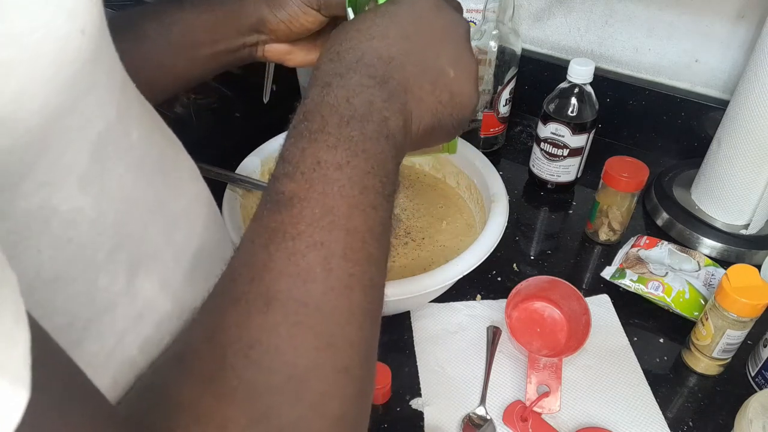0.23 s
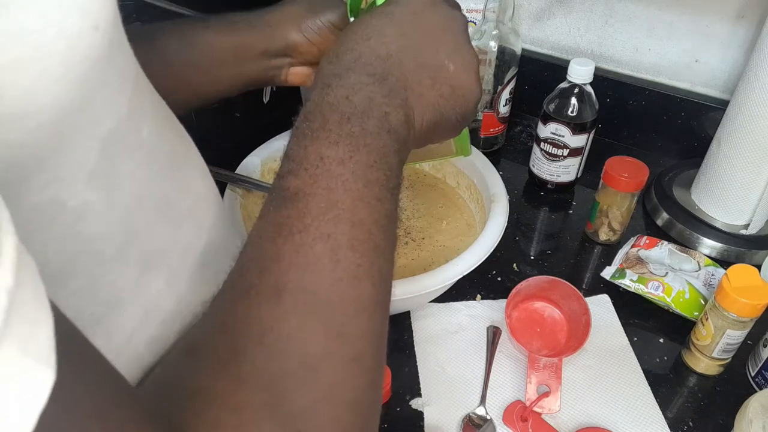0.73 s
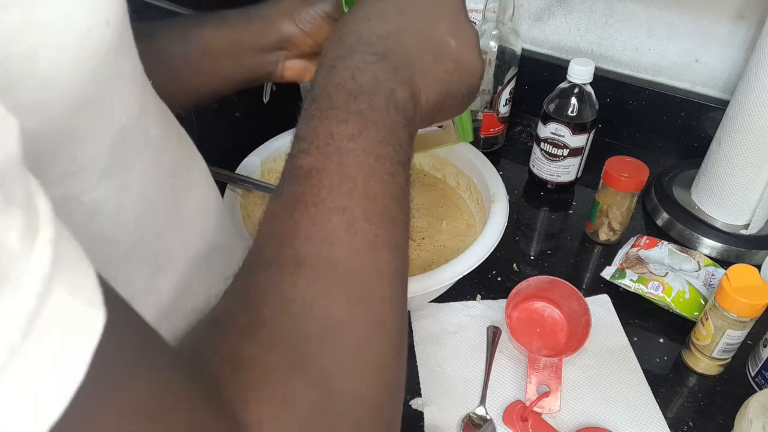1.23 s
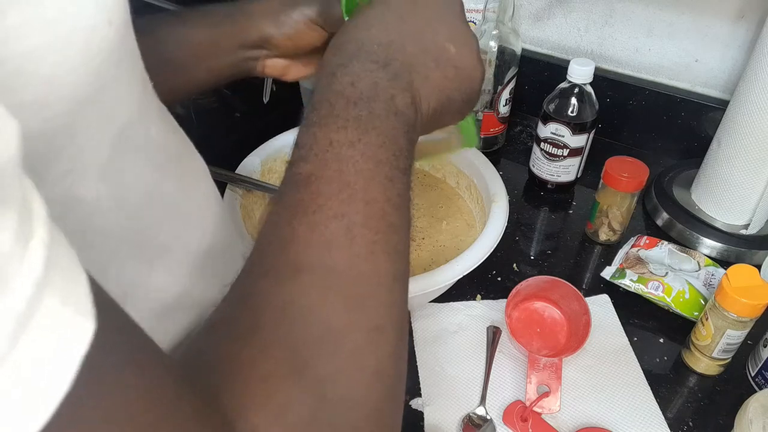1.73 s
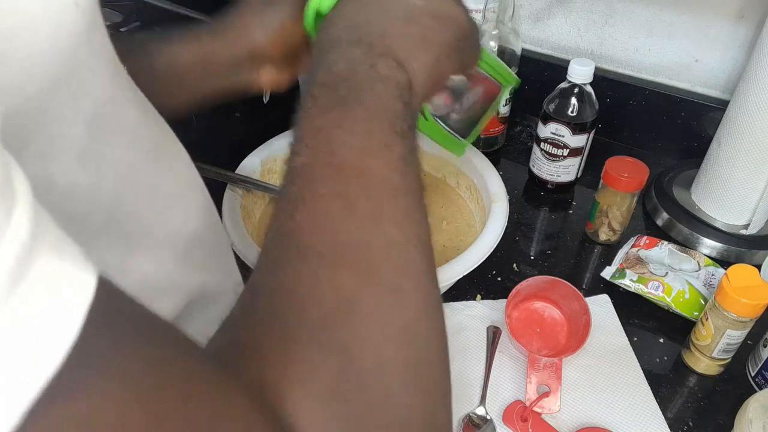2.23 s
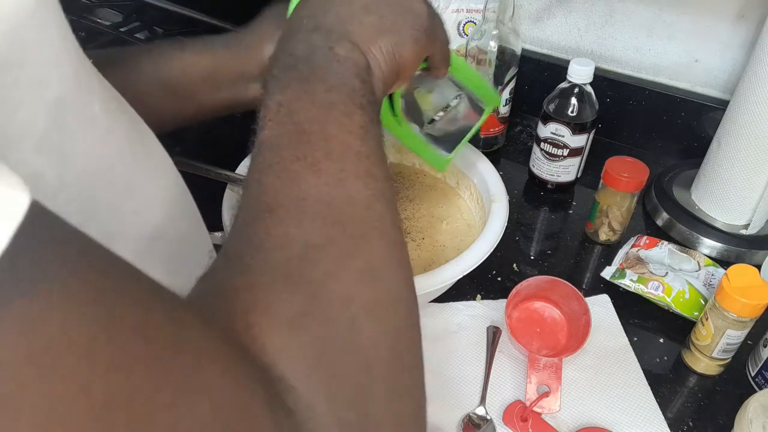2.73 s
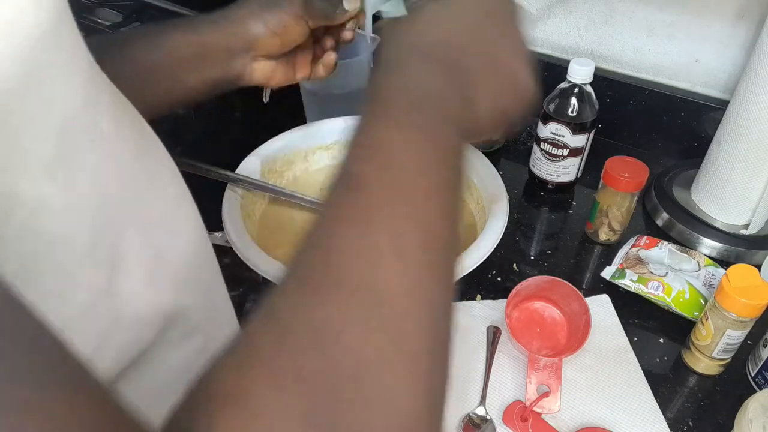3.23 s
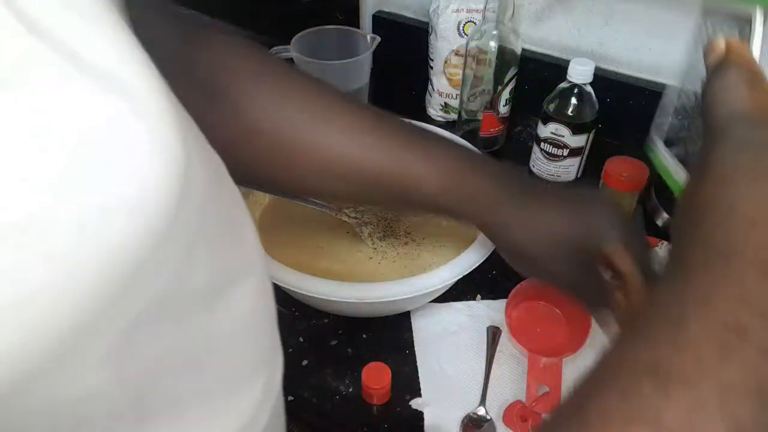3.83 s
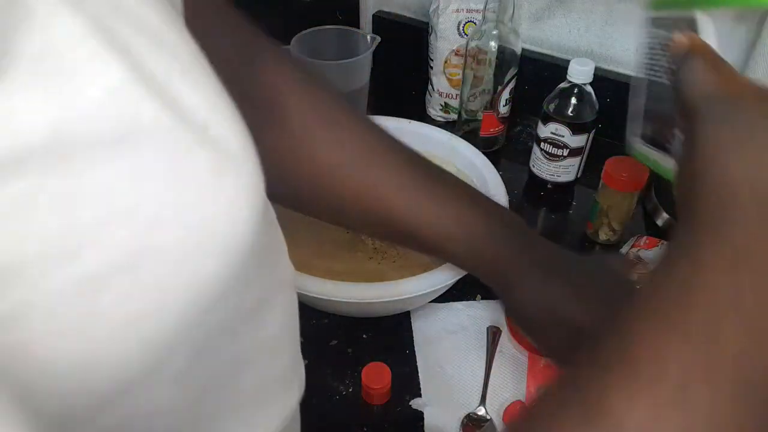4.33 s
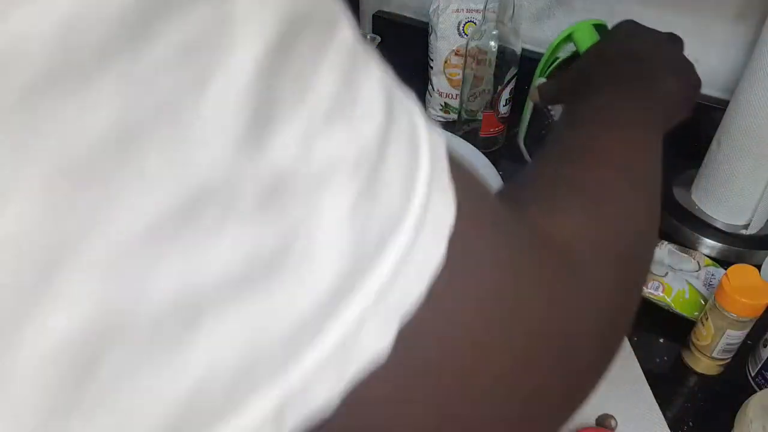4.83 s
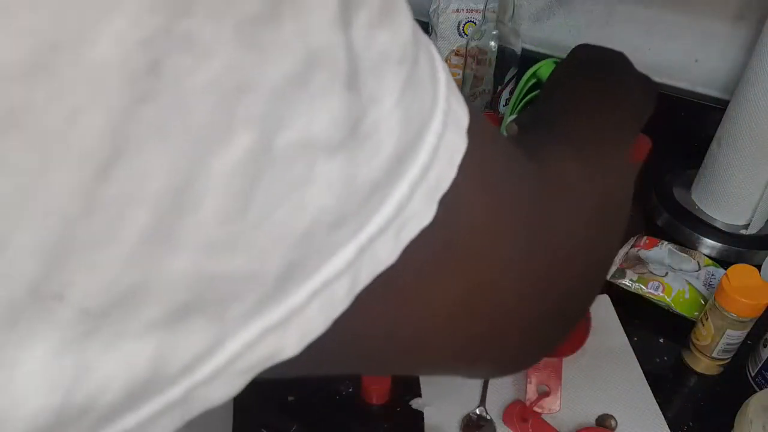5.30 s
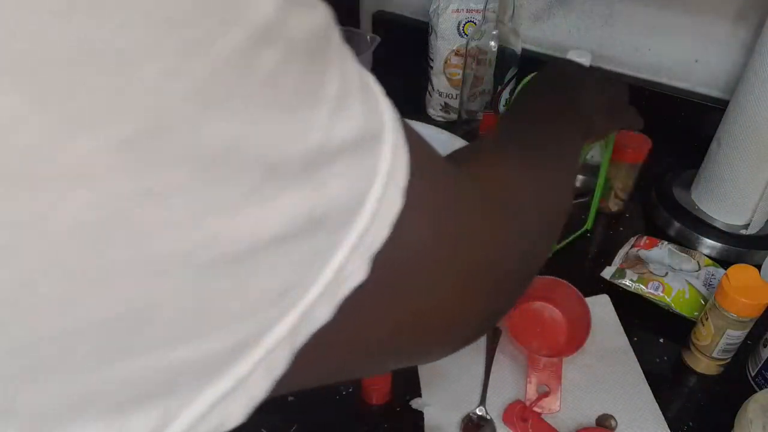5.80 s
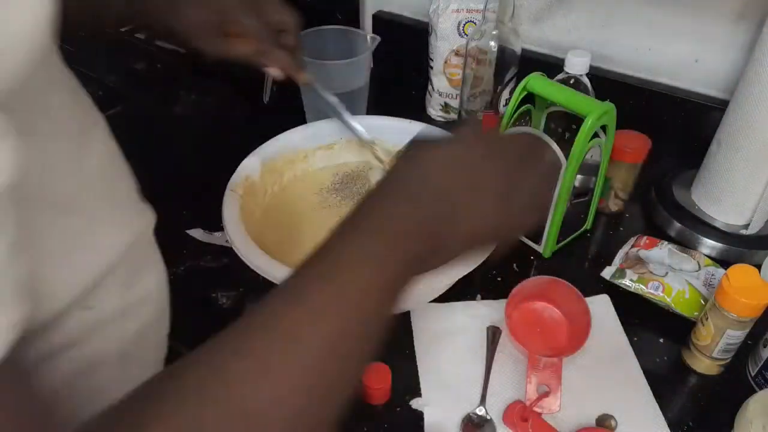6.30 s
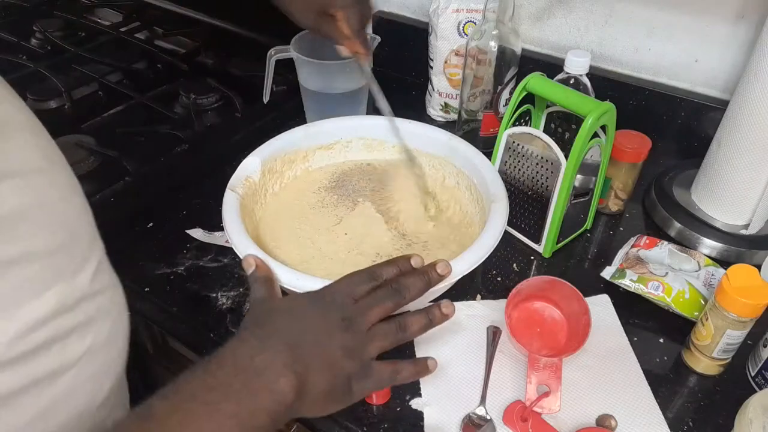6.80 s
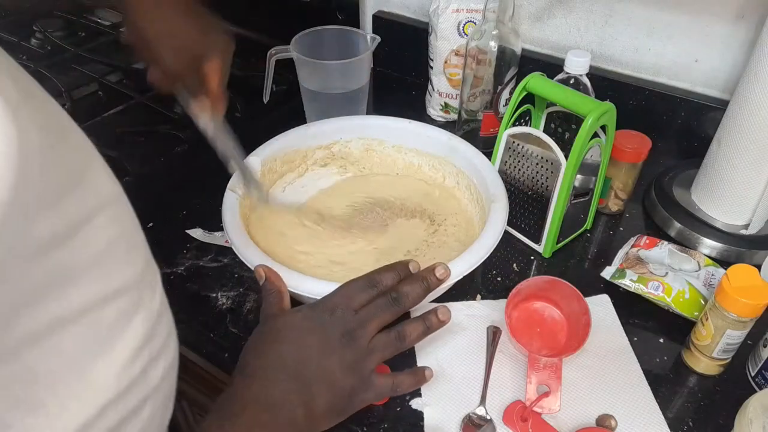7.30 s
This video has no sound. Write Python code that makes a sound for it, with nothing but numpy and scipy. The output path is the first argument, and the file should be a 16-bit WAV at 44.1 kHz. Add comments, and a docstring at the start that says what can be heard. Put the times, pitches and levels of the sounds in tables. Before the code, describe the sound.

In a humming kitchen, nutmeg rasps fast over steel teeth, the grater is tapped clean and knocked onto the counter, then batter is stirred.

```python
"""Kitchen: a nutmeg is rasped on a small steel grater in a plastic frame, over a bowl of batter.
The grater is tapped clean four times, then stood on the counter, where it rocks and clatters.
A spoon stirs the batter and knocks the bowl; an appliance hums throughout.
Rasp and batter are dense random impulses, filtered; blows are noise rattles plus decaying modes;
skids and swishes are gliding resonances. Echoes place each source in the room."""
import sys
import numpy as np
from scipy import signal
from scipy.fft import rfft, irfft
from scipy.io import wavfile
from scipy.ndimage import uniform_filter1d

SR = 44100
rng = np.random.default_rng(int(sys.argv[2]) if len(sys.argv) > 2 else 0)


def log_audio(samples):
    """Write samples as a 16-bit WAV file to the path given in sys.argv[1]."""
    # one column per channel
    frames = np.atleast_2d(samples).T
    # limit to full scale, then quantise
    limited = np.clip(frames, -1, 1)
    pcm = np.round(limited * 32767).astype(np.int16)
    wavfile.write(sys.argv[1], SR, pcm)


N = 332955

# All table levels are relative: source and room gains follow.
# nutmeg strokes: (start [s], time to hardest push [s], length [s], level [dB], tooth fizz [dB],
# singing mode [Hz], its level [dB])
STROKE_ROWS = [(0.0, 0.0027, 0.048, -49, -11, 2580, -82), (0.413, 0.014, 0.14, -49, -11.5, 2580, -60),
               (0.651, 0.031, .075, -44, -6, 2550, -49), (0.762, 0.065, 0.064, -36, -5.5, 2610, -41),
               (0.899, 0.041, 0.073, -35, -8.5, 930, -37.5), (1.012, 0.033, 0.043, -36, -5.5, 920, -34.5),
               (1.129, 0.046, 0.058, -40, -3, 2670, -47), (1.237, 0.026, 0.07, -32.5, -4.5, 2700, -35),
               (1.356, 0.059, 0.058, -35, -4, 1780, -37), (1.461, 0.035, 0.047, -28, -6.5, 2730, -46),
               (1.558, 0.06, 0.059, -40, -8.5, 2680, -64), (1.678, 0.018, .06, -52, -3.5, 2660, -59)]
# light slides between strokes: (start [s], length [s], level [dB])
SLIDE_ROWS = [(0.334, .3, -66), (0.676, 0.79, -54.5), (1.208, 0.34, -55.5), (1.596, 0.14, -74)]
# grating plate modes: (frequency [Hz], width before damping [Hz], level [dB])
PLATE_MODES = [(337, 3.1, -1), (970, 74, -4), (1314, 36, 0), (1414, 43, -10.5), (1810, 110, -1),
               (2578, 39, -3), (3430, 68, -30), (3770, 120, -20), (4150, 46, -9), (5240, 51, -34.5),
               (6940, 53, -9.5), (8850, 77, -34.5), (11320, 380, -21.5), (13400, 190, -15)]
# rasp spectrum: (frequency [Hz], level [dB per Hz])
RASP_SPECTRUM = [(140, -56), (230, -31.5), (322, -8), (468, -22), (600, -8), (855, -6.5), (918, 3.5),
                 (1100, -6), (2390, -2), (2570, -4), (3360, -13.5), (4230, -12.5), (7870, -22.5),
                 (13900, -20.5), (16000, -25)]
# scrape on the plate before a tap: (time [s], length [s], level [dB], first [Hz], last [Hz], width [Hz])
SCRAPE_ROWS = [(2.689, 0.067, -54, 2500, 3000, 706)]
# nutmeg catches on a tooth: (time [s], level [dB], bass [dB], treble [dB])
CATCH_ROWS = [(0.428, -27, 10.5, -7), (0.494, -27.5, 12.5, -3.5), (0.659, -30, 7, -6.2),
              (0.689, -16, -4, -5), (0.909, -21.5, 2.2, 1.5), (1.051, -20, -2.5, 2),
              (1.245, -27.5, -5.5, 3.5), (1.275, -18, -8, 11.5), (1.393, -16, 4.5, -7),
              (1.496, -12, -2.5, 2.5), (1.612, -30.5, -10, 5)]
# grater tapped clean: (time [s], peak [dB], bass [dB], treble [dB], rattle t60 [s])
TAP_ROWS = [(2.292, -28, -0.5, -3, 0.14), (2.531, -24, -8.5, -16.5, 0.056),
            (2.755, -17.5, -18, -17.5, 0.039), (2.998, -21.5, -15, -21, 0.1)]
# tap contact spectrum: (frequency [Hz], level [dB per Hz])
TAP_SPECTRUM = [(88, -32), (150, -16.5), (315, -13), (790, -9.5), (923, -2.5), (1360, -2.5), (1790, -4),
                (2020, -2), (2180, -9.5), (3350, -21), (5360, -30.5), (5790, -27), (7620, -38.5),
                (11700, -40), (16000, -41)]
# hand-held grater modes: (frequency [Hz], level [dB], t60 [s])
HELD_MODES = [(670, -15, 0.08), (890, 0.5, 0.073), (1008, -3, 0.059), (1200, -12, 0.39), (1590, -7, 0.097),
              (1787, 12, 0.05), (1940, -26, 0.079), (2145, 0, 0.088), (2590, -9, 0.12), (3634, -25, .2),
              (4800, -21, 0.12)]
# grater lands, rocks, is moved: (time [s], peak [dB], bass [dB], treble [dB], rattle t60 [s])
KNOCK_ROWS = [(4.755, -16, -4, -15, 0.26), (4.834, -9.5, -5.5, -16, 0.16),
              (4.863, -13.5, -14.5, -50, 0.086), (4.891, -21, -17, -24, 0.062),
              (4.926, -19.5, -15, -47.5, 0.07), (4.966, -23, -14, -47, 0.09),
              (5.115, -30, -7.5, -16, 0.037), (5.132, -30, -4, -15, 0.25), (5.375, -25.5, 6, -23.5, 0.21),
              (5.418, -13.5, -17.5, -30.5, 0.17), (5.625, -6.5, -14, -22, 0.17),
              (5.631, -11.5, -13, -38.5, 0.11), (5.746, -9.5, -8.5, -19.5, 0.082),
              (5.774, -15, -22, -25.5, 0.1)]
# counter contact spectrum: (frequency [Hz], level [dB per Hz])
KNOCK_SPECTRUM = [(35, -33), (60, -3), (124, -10), (184, -10), (338, 3.5), (427, -4.5), (593, -2.5),
                  (1470, -10), (1620, -19.5), (1860, -16), (2140, -20), (4320, -42.5), (7940, -52.5),
                  (13600, -55.5), (16000, -61)]
# frame on the counter, modes: (frequency [Hz], level [dB], t60 [s])
FRAME_MODES = [(112, -22.5, .25), (282, 4.5, 0.058), (355.1, -6, 0.37), (435, -4.5, 0.076), (507, 1, 0.15),
               (589, -17.5, 0.37), (653, -22.5, 0.16), (715, -15, 0.13), (860.2, -4.5, 0.43),
               (960, -7, 0.32), (1240, 1.5, 0.094), (1634, -3.5, 0.22), (1703, 0.5, 0.067),
               (1750, -29.5, 0.15)]
# feet judder on the counter: (time [s], length [s], level [dB], first [Hz], last [Hz], width [Hz])
SKID_ROWS = [(4.83, 0.041, -29.5, 335, 365, 130), (4.865, 0.05, -21.5, 550, 635, 150),
             (4.92, 0.022, -28, 328, 356, 120), (4.925, 0.1, -32.5, 537, 697, 154),
             (4.966, 0.027, -39, 326, 400, 130), (5.128, 0.04, -31.5, 605, 565, 110),
             (5.765, 0.074, -29.5, 780, 780, 161)]
# high plate ring after landing, heard on through the rocking: (time [s], peak [dB])
ZING_ROWS = [(4.863, -31), (5.116, -48.5)]
# free plate modes: (frequency [Hz], level [dB], t60 [s])
ZING_MODES = [(2095, 2, 0.61), (2580, -6.5, 0.52), (4630, -5, 0.12), (5750, -1.5, 0.2), (8500, -10.5, 0.29),
              (10600, -15, 0.19)]
# low thumps, and the low body of the knocks:
# (time [s], level before rise [dB], frequency [Hz], t60 [s])
THUMP_ROWS = [(1.277, -35, 330, 0.15), (1.501, -22, 330, 0.12), (1.501, -32, 568, 0.077),
              (4.754, -21, 318, 0.12), (4.759, -28, 121, 0.13), (4.831, -13, 310, 0.088),
              (5.116, -24.5, 318, 0.1), (5.419, -28.5, 114, 0.087), (5.626, -32.5, 359, 0.22),
              (5.63, -25, 114.5, 0.11), (5.745, -26, 248, .1), (5.749, -24.5, 123.6, 0.11),
              (6.485, -19.5, 118, 0.094), (6.495, -22, 78.4, 0.11), (6.541, -28, 73, 0.078),
              (7.367, -12.5, 102.5, 0.043)]
# spoon sweeps through batter: (start [s], length [s], level [dB], wet fizz [dB])
STIR_ROWS = [(6.393, 0.16, -78.5, 10.5), (6.552, 0.11, -54.5, -6.5), (6.676, 0.44, -69.5, 4.5),
             (6.863, 0.27, -50, -10.5), (7.121, 0.14, -51.5, 1), (7.276, 0.03, -44.5, -15),
             (7.4, 0.13, -65, 6.5)]
# batter pop spectrum: (frequency [Hz], level [dB per Hz])
BATTER_SPECTRUM = [(180, -17), (300, -10), (478, -9.5), (645, 0), (749, -1.5), (1140, -5), (1810, -6),
                   (2070, -9), (4370, -23.5), (8090, -30.5), (12700, -34.5), (16000, -32)]
# spoon swishes: (time [s], length [s], level [dB], first [Hz], last [Hz], width [Hz])
SWISH_ROWS = [(6.405, 0.045, -47, 247, 260, 163), (6.405, 0.067, -61.5, 2280, 2350, 251),
              (6.405, 0.059, -67, 4900, 5060, 594), (6.87, 0.047, -49, 2090, 2500, 700),
              (6.92, 0.038, -57, 4300, 4450, 900), (6.94, 0.029, -47.5, 750, 865, 255),
              (7.04, 0.069, -49, 1080, 1540, 400), (7.14, 0.06, -53, 2600, 4050, 2200),
              (7.29, 0.013, -45, 1100, 980, 250)]
# spoon hits bowl: (time [s], peak [dB], bass [dB], treble [dB], rattle t60 [s])
SPOON_ROWS = [(6.486, -21.5, -2, -9.5, 0.023), (7.355, -11.5, -21.5, -33.5, 0.019)]
# spoon contact spectrum: (frequency [Hz], level [dB per Hz])
SPOON_SPECTRUM = [(120, -38), (200, -20.5), (271, -33), (360, -24), (532, -17), (624, 1), (800, -11),
                  (1030, -2.5), (1270, -10), (1340, -12), (1540, -18), (2200, -26), (3560, -56),
                  (14000, -70)]
# mixing bowl modes: (frequency [Hz], level [dB], t60 [s])
BOWL_MODES = [(349.4, -8, 0.23), (418, -7, 0.14), (638, -1.5, 0.17), (915, -16, 0.24), (995, 8, 0.095),
              (1081, -3.5, 0.19), (1160, -18, 0.4), (1242, 3.5, 0.14)]
# ticks of things handled: (time [s], peak [dB], bass [dB], treble [dB], rattle t60 [s])
TICK_ROWS = [(1.892, -37, -18, 4, 0.014), (1.992, -51, -17, 3, 0.025), (4.039, -52.5, 14, -10, 0.088),
             (4.16, -47.5, 0, -15.5, 0.029), (4.295, -45, -24, -10, 0.053), (4.313, -43.5, -23, -24, 0.091),
             (7.256, -32, -9.5, -15, 0.0072), (7.466, -44, -17, -13, 0.037)]
# tick spectrum: (frequency [Hz], level [dB per Hz])
TICK_SPECTRUM = [(240, -76), (400, -7.5), (964, 0), (1630, -2.5), (4200, -26.5), (5600, -19), (7870, -29),
                 (13500, -25), (16000, -67)]
# crisp dry snaps: (time [s], peak [dB])
SNAP_ROWS = [(3.865, -40), (4.046, -48), (4.064, -46), (4.074, -47), (7.256, -26.5)]
# snap spectrum: (frequency [Hz], level [dB per Hz])
SNAP_SPECTRUM = [(2000, -38), (6000, -9), (11000, 1), (16000, -5)]
# sleeve slides as the arm reaches across: (start [s], length [s], level [dB])
RUSTLE_ROWS = [(5.16, 0.29, -68), (5.446, .14, -63), (5.583, 0.027, -47.5), (6.37, .09, -72)]
# cloth spectrum: (frequency [Hz], level [dB per Hz])
CLOTH_SPECTRUM = [(500, -1.5), (2000, -6.5), (5500, -10.5), (9000, -13.5), (16000, -9.5)]
# appliance hum: (frequency [Hz], rms level [dB])
HUM_TONES = [(48.4, -53), (102.3, -74), (360.7, -74), (398.4, -77.5), (446.8, -75.5)]
# fan noise and hiss spectrum: (frequency [Hz], level [dB per Hz])
AIR_SPECTRUM = [(41, -39.5), (70, -6), (108, -1), (174, -21.5), (328, -12.5), (351, -17), (451, -16.5),
                (606, -24.5), (711, -23.5), (1370, -36.5), (1890, -34.5), (4000, -44), (5620, -39.5),
                (7560, -45), (16000, -35)]
# room decay: (frequency [Hz], t60 [s])
ROOM_T60 = [(100, 0.65), (350, 0.58), (1000, 0.47), (4000, 0.48), (8000, 0.45), (15000, 0.44)]
# left-right likeness of echoes and air: (frequency [Hz], correlation [0-1])
LIKENESS = [(100, 0.55), (300, 0.69), (600, 0.21), (1200, 0.03), (4000, 0.016), (15000, .02)]

BASS_HZ, TREBLE_HZ, EDGE_HZ = 700, 3500, 16150
PLATE_CUT_HZ = 222  # low cut that keeps the plate ring thin
BITE_S, BITE_DB, EASE_DB, RELEASE_DB_PER_S = 0.0049, -6.5, -9.5, -500
BASS_START_DB, BASS_DB_PER_S, BASS_TOP_DB = -7.5, 191, 1.5  # frame shudder grows during a stroke
SING_S, SING_WIDTH_HZ = 0.042, 130
CATCH_T60_S = 0.023


def grating(chips_per_s=2600, rows_per_s=170, rows_db=3, ring_db=-4.0, bass_db=-2.4, fizz_db=4.0):
    """Teeth snap off tiny chips, in clumps as the rows pass; each chip rings the plate."""
    clumps = np.interp(np.arange(N) * rows_per_s / SR, np.arange(N), rng.standard_normal(N))
    chips = impulses(chips_per_s, cap=3) * amp(rows_db * np.clip(clumps, -1.5, 1.5))
    rung = np.zeros(N)
    for here in shares(per_s=17, count=7):
        plate_ring = ring(loaded(plate(damping=1.3), detune=.035, spread_db=4))
        rung += signal.oaconvolve(chips * here, evened(plate_ring))[:N]
    thin_ring = split(rung, PLATE_CUT_HZ)[1]
    rasp = evened(colour(chips, RASP_SPECTRUM)) + amp(ring_db) * evened(thin_ring)
    low, middle, high = map(evened, bands(rasp))
    bass, push, fizz = stroking()
    return amp(bass_db) * bass * low + push * middle + amp(fizz_db) * fizz * high


def stroking(slide_bass_db=3.0, slide_fizz_db=-6):
    """Bass, middle and fizz gains: strokes bite, peak, ease and let go, over light sliding."""
    slide = sum(swell(s, length, attack_s=0.019, release_s=.025) * amp(db) for s, length, db in SLIDE_ROWS)
    power = (amp([[slide_bass_db], [0], [slide_fizz_db]]) * slide) ** 2
    t = np.arange(SR // 4) / SR
    bass = np.minimum(BASS_START_DB + BASS_DB_PER_S * t, BASS_TOP_DB)
    for s, peak_s, length, db, fizz, _, _ in STROKE_ROWS:
        push_db = np.interp(t, [0, peak_s, max(length, peak_s)], [BITE_DB, 0, EASE_DB])
        push_db += RELEASE_DB_PER_S * np.maximum(t - length, 0)
        push = np.minimum(t / BITE_S, 1) * amp(db + push_db)
        for band, share in zip(power, (bass, 0, fizz)):
            add(band, s, (push * amp(share)) ** 2)
    return np.sqrt(power)


def singing():
    """As the teeth bite, slips excite one plate mode per stroke; a scrape glides upward."""
    rows = [(s, SING_S, db, hz, hz, SING_WIDTH_HZ) for s, _, _, _, _, hz, db in STROKE_ROWS]
    return chatter([*rows, *SCRAPE_ROWS], slips_per_s=880, spread_db=4.5, edge_s=0.013)


def catches(ring_db=-7):
    """The nutmeg snags and lets go, kicking the plate."""
    out = np.zeros(N)
    for s, db, bass, treble in CATCH_ROWS:
        modes = loaded(plate(damping=1.5), detune=.03, spread_db=4)
        low, middle, high = bands(blow(RASP_SPECTRUM, modes, CATCH_T60_S, ring_db))
        sound = amp(bass) * low + middle + amp(treble) * high
        add(out, s, amp(db) * sound / crest(low + middle + high))
    return out


def plate(damping, hand_hz=35):
    """Steel plate modes as (Hz, dB, t60 s); damping and the gripping hand widen them all."""
    modes = []
    for hz, width, db in PLATE_MODES:
        t60 = np.log(1000) / np.pi / (width * damping + hand_hz)
        modes.append((hz, db + 10 * np.log10(width / PLATE_MODES[0][1]), t60))
    return modes


def loaded(modes, detune, spread_db):
    """Where the nutmeg presses, it shifts the modes and feeds some more than others."""
    draws = rng.uniform(-1.2, 1, (len(modes), 2))
    return [(hz * (1 + detune * a), db + spread_db * b, t60)
            for (hz, db, t60), (a, b) in zip(modes, draws)]


def taps():
    """Tapping rattles the contact and rings the hand-held grater."""
    return blows(TAP_ROWS, TAP_SPECTRUM, HELD_MODES, ring_db=0, bass_db=7, treble_db=9.5)


def knocks():
    """Counter contacts rattle and ring the frame."""
    return blows(KNOCK_ROWS, KNOCK_SPECTRUM, FRAME_MODES, ring_db=-2.5, bass_db=14.0, treble_db=16)


def skids():
    """The feet judder across the counter, slipping through gliding resonances."""
    return chatter(SKID_ROWS, slips_per_s=1500, spread_db=0.5, edge_s=0.0058)


def zings():
    """High modes of the steel ring after landing and on through the rocking."""
    out = np.zeros(N)
    for s, db in ZING_ROWS:
        sound = ring(ZING_MODES)
        add(out, s, amp(db) * sound / crest(sound))
    return out


def thumps(rise_s=0.0052):
    """Low thumps and the low body of the knocks: single modes that swell for milliseconds and die."""
    out, t = np.zeros(N), np.arange(SR // 2) / SR
    for s, db, hz, t60 in THUMP_ROWS:
        add(out, s, ring([(hz, db, t60)]) * (1 - np.exp(-t / rise_s)) ** 2)
    return out


def stirring(pops_per_s=2500, fizz_db=1.5, split_hz=1500):
    """The spoon drags through batter: each sweep is a dense run of tiny wet pops."""
    pops = impulses(pops_per_s, cap=4)
    low, high = map(evened, split(colour(pops, BATTER_SPECTRUM), split_hz))
    out = np.zeros(N)
    for s, length, db, fizz in STIR_ROWS:
        sweep = swell(s, length, attack_s=0.027, release_s=0.012) * amp(db)
        out += sweep * (low + amp(fizz + fizz_db) * high)
    return out


def swishes():
    """The spoon swishes through the batter: random impulses in gliding resonances."""
    return chatter(SWISH_ROWS, slips_per_s=2500, spread_db=3, edge_s=.026)


def spoon():
    """The spoon's short contact rattle rings the bowl."""
    return blows(SPOON_ROWS, SPOON_SPECTRUM, BOWL_MODES, ring_db=-4.5, bass_db=16.0, treble_db=13.5)


def ticks():
    """Small handling contacts, with a damped plate ring."""
    return blows(TICK_ROWS, TICK_SPECTRUM, plate(damping=2.5), ring_db=-8, bass_db=-1, treble_db=15.5)


def snaps(decay_s=.0006):
    """Tiny dry noise clicks with no ring."""
    out, t = np.zeros(N), np.arange(SR // 50) / SR
    for s, db in SNAP_ROWS:
        sound = colour(rng.standard_normal(len(t)) * np.exp(-t / decay_s), SNAP_SPECTRUM)
        add(out, s, amp(db) * sound / crest(sound))
    return out


def rustle(fibres_per_s=4000):
    """Cotton slides as the arm reaches across: dense fibre impulses."""
    cloth = evened(colour(impulses(fibres_per_s, cap=4), CLOTH_SPECTRUM))
    return cloth * sum(swell(s, length, attack_s=0.0074, release_s=.009) * amp(db)
                       for s, length, db in RUSTLE_ROWS)


def background(hum_db=0.9, hum_pan_db=-5, air_db=-59.5):
    """Mains hum of an appliance, as steady sines, over soft fan noise and hiss."""
    t = np.arange(N) / SR
    hum = sum(np.sqrt(2) * amp(db) * np.sin(2 * np.pi * (hz * t + rng.random())) for hz, db in HUM_TONES)
    left, right = [colour(noise, AIR_SPECTRUM) for noise in rng.standard_normal((2, N))]
    sides = np.array([[.5], [-.5]])
    return amp(hum_db + hum_pan_db * sides) * hum + amp(air_db) * evened(pair(left, right))


def blows(rows, spectrum, modes, ring_db, bass_db, treble_db, crack_db=5, crack_s=0.0064):
    """Each blow has its own typed share of bass and treble."""
    out = np.zeros(N)
    for s, db, bass, treble, t60 in rows:
        low, middle, high = bands(blow(spectrum, modes, t60, ring_db))
        # first touch is brightest
        crack = 1 + amp(crack_db) * np.exp(-np.arange(len(high)) / SR / crack_s)
        sound = amp(bass + bass_db) * evened(low) + evened(middle)
        sound += amp(treble + treble_db) * evened(high * crack)
        add(out, s, amp(db) * sound / crest(sound))
    return out


def blow(spectrum, modes, t60, ring_db):
    """A rattling contact, with the ring of the struck thing."""
    t = np.arange(SR // 2) / SR
    rattle = rng.choice([-1., 1.], len(t)) * amp(-60 * t / max(t60, .004))
    return evened(colour(rattle, spectrum)) + amp(ring_db) * evened(ring(modes))


def ring(modes):
    """Half a second of decaying modes, each starting up or down at random."""
    t = np.arange(SR // 2) / SR
    return sum(rng.choice([-1, 1]) * amp(db - 60 * t / max(t60, .01)) * np.sin(2 * np.pi * hz * t)
               for hz, db, t60 in modes)


def chatter(rows, slips_per_s, spread_db, edge_s):
    """Quick uneven slips feed a resonance that may glide as the contact moves."""
    out, t = np.zeros(N), np.arange(SR // 4) / SR
    for s, length, db, first_hz, last_hz, width in rows:
        sizes = amp(spread_db * rng.standard_normal(len(t))) * rng.choice([-1, 1], len(t))
        slips = sizes * (rng.random(len(t)) < slips_per_s / SR)
        glide_hz = np.interp(t, [0, length], [first_hz, last_hz])
        turn = np.exp(2j * np.pi * np.cumsum(glide_hz) / SR)
        r = np.exp(-np.pi * width / SR)
        # filter at 0 Hz, then shift up; the first pass warms up the resonance
        swing = signal.lfilter([1], np.poly([r, r]), np.tile(slips / turn, 2))[len(t):]
        gain = np.clip(t / edge_s, 0, 1) * np.exp(-np.maximum(t - length, 0) / edge_s)
        sound = (turn * swing).real * gain
        add(out, s, amp(db) * sound / np.sqrt(np.sum(sound ** 2) / np.sum(gain ** 2)))
    return out


def impulses(per_s, cap, spread_db=3):
    """Random impulses of either sign and uneven size."""
    size = amp(spread_db * np.minimum(rng.exponential(1, N), cap))
    return size * rng.choice([-1, 1], N) * (rng.random(N) < per_s / SR)


def swell(start, length, attack_s, release_s):
    """Gain of one gesture: it rises, holds for its length and dies away."""
    t = np.arange(N) / SR - start
    return np.clip(t / attack_s, 0, 1) * np.exp(-np.maximum(t - length, 0) / release_s)


def shares(per_s, count):
    """Rotating windows whose squares sum to 1: a moving thing passes through several positions."""
    away = (np.arange(N) * per_s / SR - np.arange(count)[:, None] + 1) % count - 1
    return np.cos(np.pi / 2 * np.minimum(abs(away), 1))


def amp(db):
    """Decibels to gain."""
    return 10 ** (np.asarray(db) / 20)


def evened(x):
    """Scales to rms 1."""
    return x / np.sqrt(np.mean(x ** 2) + 1e-20)


def crest(x, size=128):
    """Height of the loudest few milliseconds."""
    return 2 * np.sqrt(uniform_filter1d(x ** 2, size).max())


def read(points, hz):
    """Reads a table on a log-frequency axis."""
    f, value = np.transpose(points)
    return np.interp(np.log(hz + 1), np.log(f + 1), value)


def add(mix, s, sound):
    """Mixes a sound in at time s."""
    part = mix[max(round(s * SR), 0):][:len(sound)]
    part += sound[:len(part)]


def colour(x, spectrum, size=4096):
    """Causal minimum-phase filter with the given spectrum."""
    gain_db = np.maximum(read(spectrum, abs(np.fft.fftfreq(size, 1 / SR))), -100)
    log_gain = np.log(amp(gain_db))
    taps = np.fft.ifft(np.exp(np.conj(signal.hilbert(log_gain)))).real[:size // 2]
    return signal.oaconvolve(x, taps)[:len(x)]


def split(x, hz):
    """The parts below and above hz; together they sound like the whole."""
    parts = [signal.butter(2, hz, kind, fs=SR, output="sos") for kind in ("low", "high")]
    return [signal.sosfilt(np.vstack([p, p]), x) for p in parts]


def bands(x):
    """Bass, middle and treble."""
    bass, rest = split(x, BASS_HZ)
    return bass, *split(rest, TREBLE_HZ)


def kitchen(x, level_db, pan_db, near_db, room_db, lag_s=0., count=1):
    """Direct sound, quick reflections and room tail; count > 1 varies echoes as the arms move."""
    # positive pan: louder left; positive lag: later left
    direct = np.array([np.interp(np.arange(N) - lag_s * SR, np.arange(N), x), x])
    parts = x * shares(per_s=9, count=count) if count > 1 else [x]
    near, far = np.zeros((2, N)), np.zeros((2, N))
    for part in parts:
        reflections = echoes([(100, 0.16), (15000, 0.072)], gap_s=.0008, size=4096)
        near += signal.oaconvolve(part[None], reflections, axes=1)[:, :N]
        tail = echoes(ROOM_T60, gap_s=.009, size=32768)
        far += signal.oaconvolve(part[None], tail, axes=1)[:, :N]
    heard = (direct + amp(near_db) * near + amp(room_db) * far) / np.sqrt(1 + amp(near_db) ** 2)
    return amp(level_db + np.array([[pan_db], [-pan_db]]) / 2) * heard


def echoes(t60_table, gap_s, size):
    """Stereo tail of sparse taps, each band dying at its own speed."""
    impulse_taps = rng.choice([-1., 1.], (2, size)) * (rng.random((2, size)) < .15)
    hz, t, z = signal.stft(impulse_taps, SR, nperseg=256)
    decay = amp(-60 * t / np.maximum(read(t60_table, hz), .01)[:, None])
    tail = signal.istft(z * decay, SR)[1][:, :size]
    tail = np.pad(pair(*tail), ((0, 0), (round(gap_s * SR), 0)))
    return tail / np.linalg.norm(tail[0])


def pair(a, b):
    """Two unrelated signals become a left and right that share mostly their bass."""
    same = np.clip(read(LIKENESS, np.fft.rfftfreq(len(a), 1 / SR)), -1, 1)
    angle, A, B = np.arccos(same) / 2, rfft(a), rfft(b)
    return np.array([irfft(A * np.cos(angle) + side * B * np.sin(angle), len(a)) for side in (1, -1)])


def scene():
    """Grating, tapping, setting down and stirring, each at its place in the kitchen."""
    return (kitchen(grating(), level_db=-2.5, pan_db=-0.5, near_db=5, room_db=1.0, count=5)
            + kitchen(singing(), level_db=-4, pan_db=-4, near_db=-3.2, room_db=-6.5)
            + kitchen(catches(), level_db=-3.0, pan_db=-2.0, near_db=11.0, room_db=0.5, count=3)
            + kitchen(taps(), level_db=2.5, pan_db=-1.5, near_db=2.5, room_db=0.5, count=3)
            + kitchen(knocks(), level_db=-3.5, pan_db=-1.2, near_db=-0.5, room_db=-3.0, lag_s=0.00016)
            + kitchen(skids(), level_db=-3.5, pan_db=1.3, near_db=-23.5, room_db=-10.5, lag_s=0.00011)
            + kitchen(zings(), level_db=-3.0, pan_db=-1.5, near_db=-23.5, room_db=-13)
            + kitchen(thumps(), level_db=1.5, pan_db=-5.0, near_db=-15, room_db=-14)
            + kitchen(stirring() + swishes(), level_db=-1.5, pan_db=-0.5, near_db=2.5, room_db=-3.5, count=3)
            + kitchen(spoon(), level_db=-1.5, pan_db=-0.5, near_db=6.5, room_db=1.5, lag_s=-0.000082)
            + kitchen(ticks(), level_db=-0.5, pan_db=-1.5, near_db=7.0, room_db=8.5, count=3)
            + kitchen(snaps(), level_db=-11.5, pan_db=9, near_db=-12, room_db=-16)
            + kitchen(rustle(), level_db=6.5, pan_db=-1.5, near_db=14, room_db=-21)
            + background())


def record(dry):
    """The recorder's upper band limit."""
    lowpass = signal.firwin(511, EDGE_HZ, window=("kaiser", 9), fs=SR)
    return signal.oaconvolve(dry, lowpass[None], "same")


dry = scene()
out = record(dry)
log_audio(out)
```